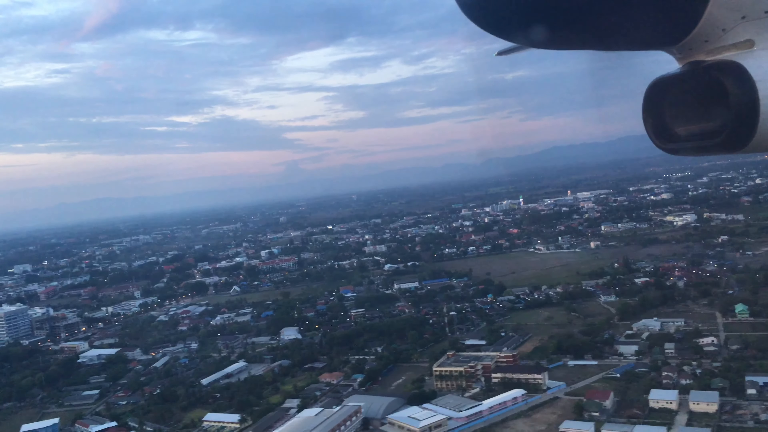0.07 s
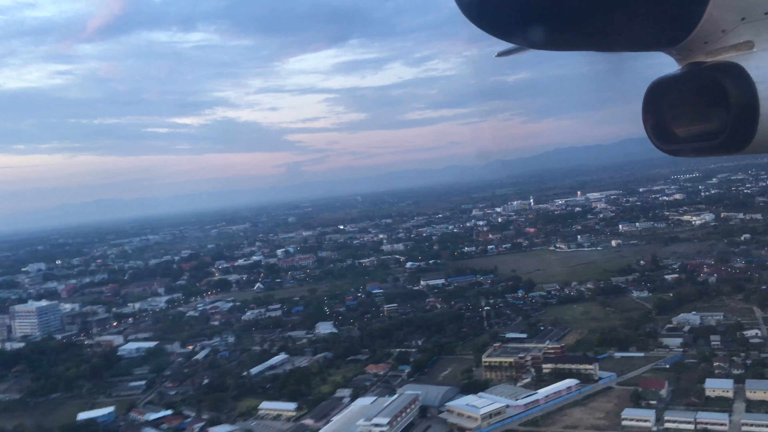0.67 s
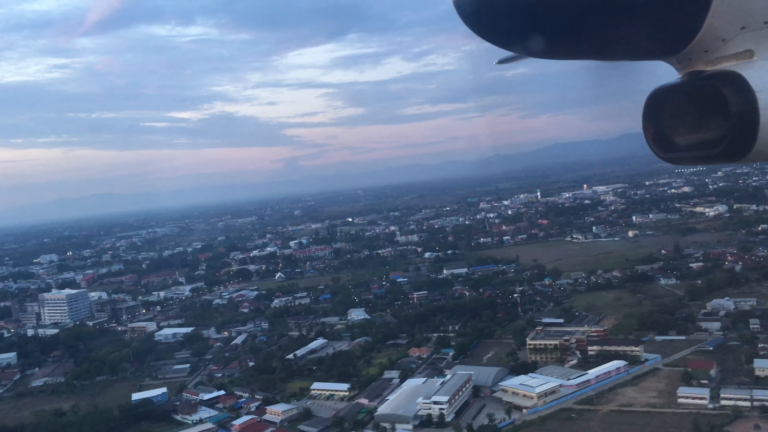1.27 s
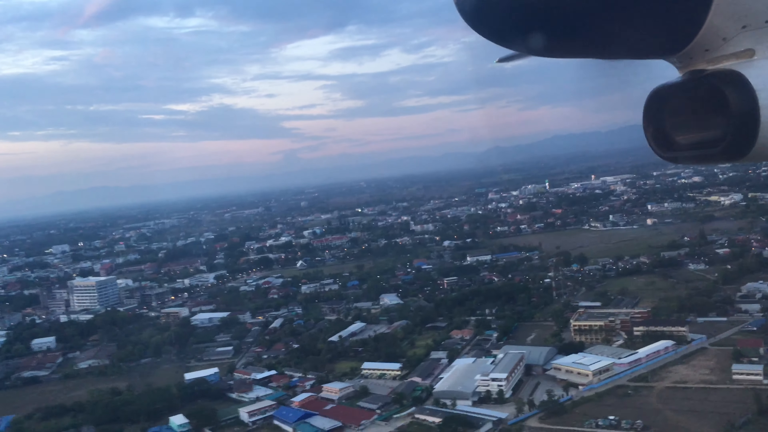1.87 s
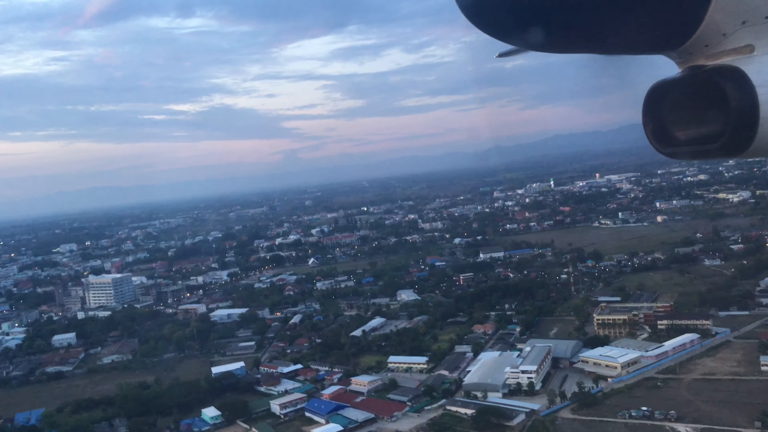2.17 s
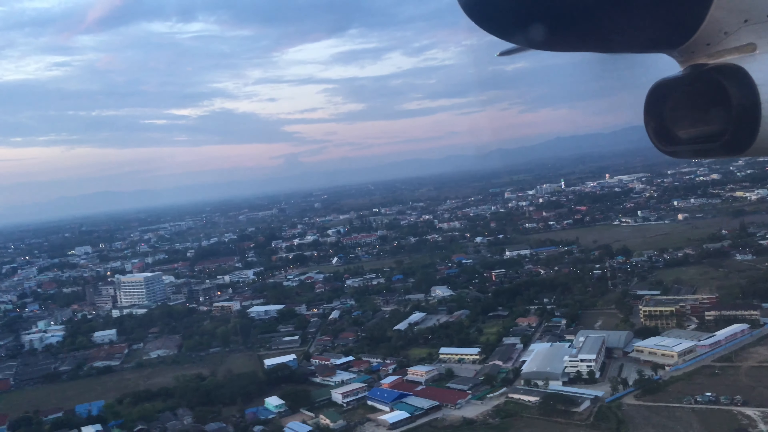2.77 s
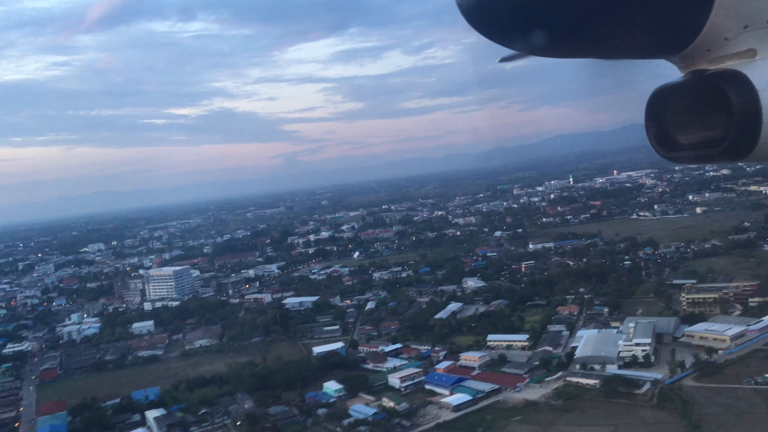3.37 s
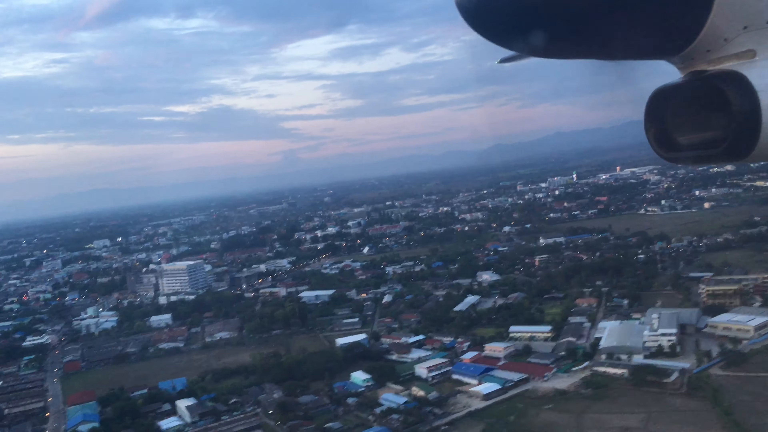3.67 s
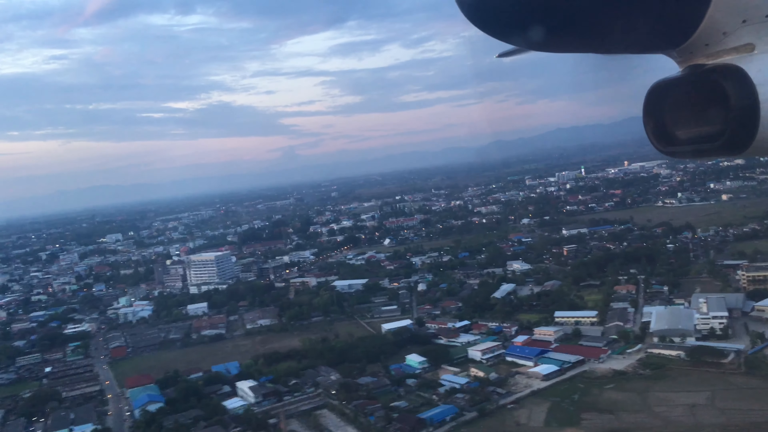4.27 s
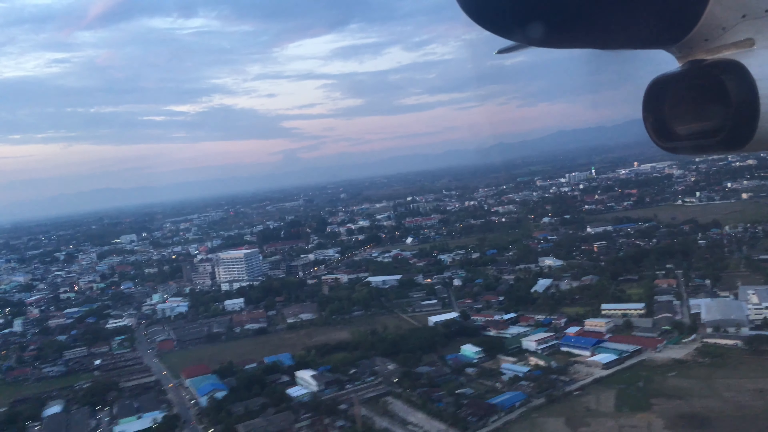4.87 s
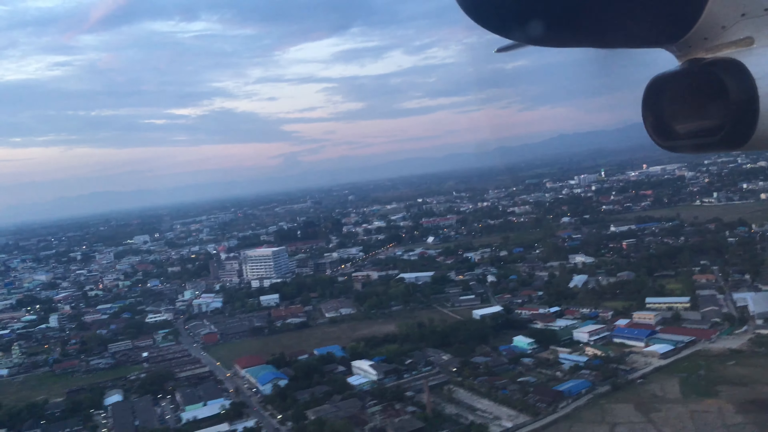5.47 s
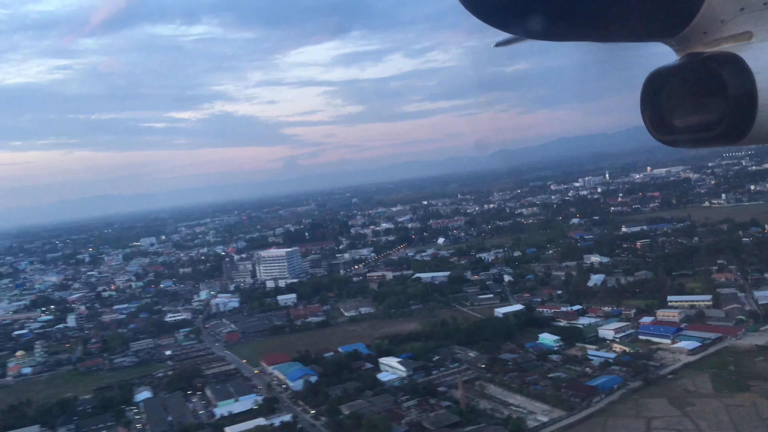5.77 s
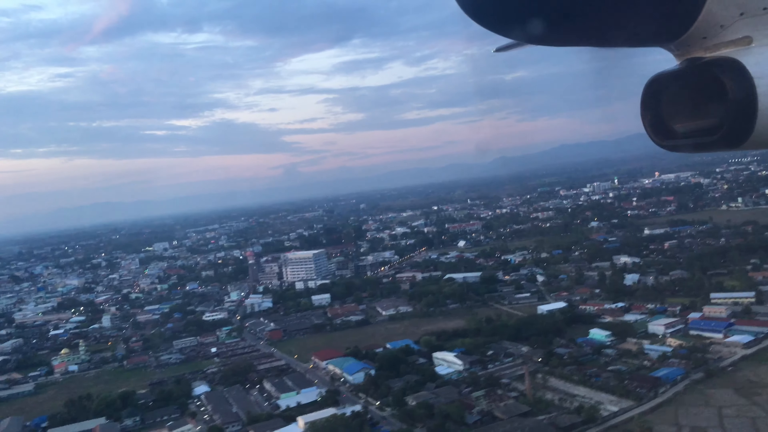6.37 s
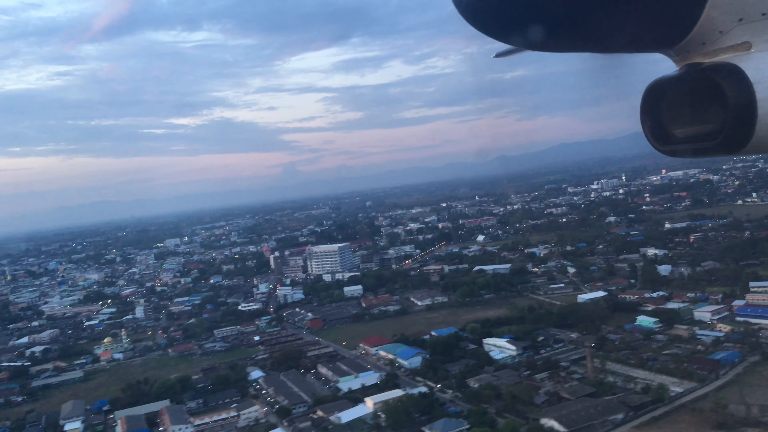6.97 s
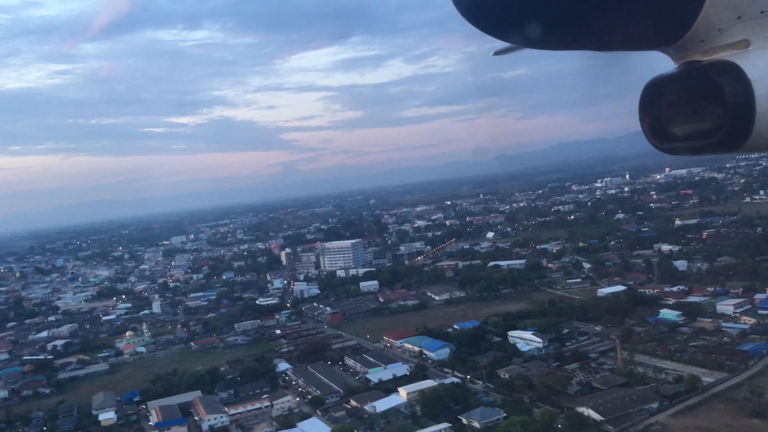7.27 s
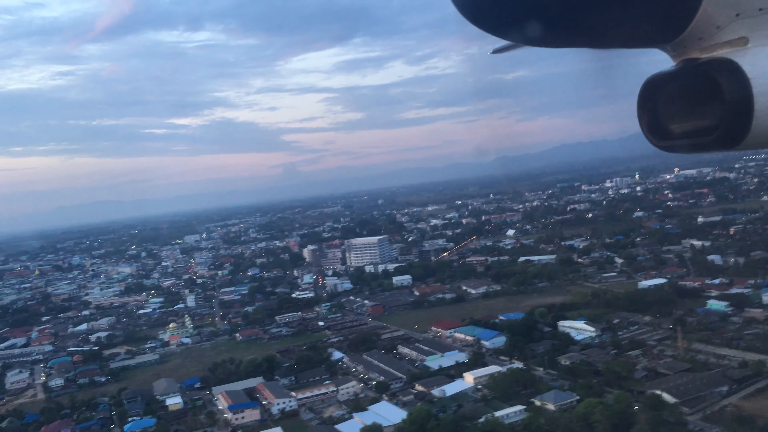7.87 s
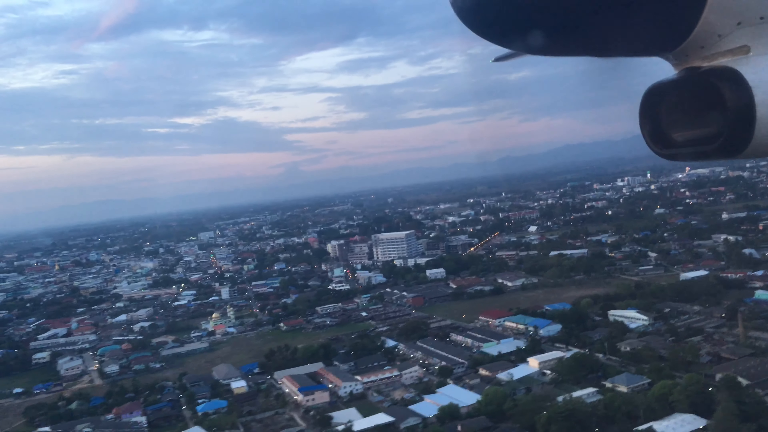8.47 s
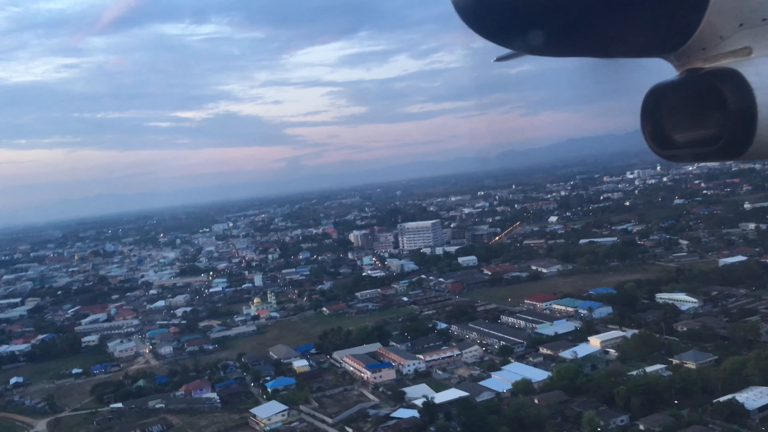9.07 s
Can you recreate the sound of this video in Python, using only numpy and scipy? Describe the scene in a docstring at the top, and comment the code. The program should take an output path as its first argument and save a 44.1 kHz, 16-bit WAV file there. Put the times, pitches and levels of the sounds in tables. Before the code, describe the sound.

A loud, deep drone of twin turboprop engines fills the cabin of a descending plane for about nine seconds, heard from a window seat next to the engine. The propeller hum keeps one pitch throughout, throbbing with small irregular swells and dips. Under it, air buffets the cabin wall with a low rumble that surges briefly at the very start and near 3.9, 5.6 and 6.7 seconds. A steady rush of air and a soft hiss run alongside. Above these sits a faint, high, buzzing turbine whine, clearest in the first second, weaker around 2.5 to 3.5 seconds, and a little buzzier from about 5.5 seconds on. A plastic trim panel gives a very faint tick at about 2.7 seconds and a slightly clearer one at 5.3 seconds. The drone continues evenly to the end.

```python
"""A deep hum, a rumble and a rush of air: a window seat beside the engine of a descending twin turboprop.
Propeller blades beat on the fuselage (hum); the slipstream buffets the cabin (rumble) and rushes
along the skin. The gas turbine, easing off a little, whines through the blades, which chop its
tones into a buzz. The cabin trim ticks."""
import sys
import numpy as np
from scipy import signal
from scipy.fft import rfft, irfft
from scipy.io import wavfile
from scipy.ndimage import uniform_filter1d

SR = 44100
rng = np.random.default_rng(int(sys.argv[2]) if len(sys.argv) > 2 else 0)


def wrap_up_sound(samples):
    """Save the sound to the file named by the first command line argument, as 16-bit audio."""
    columns = np.atleast_2d(samples).T
    # keep every value between -1 and 1, then stretch to whole-number steps
    tamed = np.clip(columns, -1, 1)
    steps = np.round(tamed * 32767).astype(np.int16)
    wavfile.write(sys.argv[1], SR, steps)


N = 407043


def undb(db):
    """dB to gain."""
    return 10 ** (np.asarray(db) / 20)


def swell(db):
    """Gain of a level curve about its own mean."""
    return undb(db - np.mean(db))


def unit(x):
    """Scale to rms 1."""
    return x / np.sqrt(np.mean(np.abs(x) ** 2))


def curves(table):
    """Columns after the first (t/s), linearly interpolated per sample."""
    times_s, *columns = np.transpose(table)
    return [np.interp(np.arange(N) / SR, times_s, column) for column in columns]


def surges(table):
    """Sum of bell-shaped level changes in dB; lengths at half height."""
    t = np.arange(N) / SR
    return sum(db * .5 ** ((2 * (t - mid_s) / length_s) ** 2) for mid_s, length_s, db in table)


def walk(rate_hz):
    """Smooth random wander, rms 1, mostly below rate_hz."""
    f = np.arange(N + 1) * SR / (2 * N)
    white = rfft(rng.standard_normal(2 * N))
    return unit(irfft(white / (1 + (f / rate_hz) ** 2))[:N])


def angle(hz):
    """Running phase in rad, random start."""
    return 2 * np.pi * (np.cumsum(hz) / SR + rng.random())


def wakes(blade_rad, sharpness):
    """One smooth pulse of height 1 per passing blade."""
    return np.exp(sharpness * (np.cos(blade_rad) - 1))


def turbulence(spectrum, resonances=()):
    """Random pressure of given spectral density, lifted at each resonance."""
    f = np.arange(N // 2 + 1) * SR / N
    hz, db = np.transpose(spectrum)
    shape_db = np.interp(np.log(f + 1), np.log(hz), db)
    for centre_hz, width_hz, boost_db in resonances:
        shape_db += boost_db * .5 ** ((2 * (f - centre_hz) / width_hz) ** 2)
    return irfft(rfft(rng.standard_normal(N)) * undb(shape_db), N) * np.sqrt(SR / 2)


def trim_ticks(scrape_s=.007, scrape_db=1.0):
    """A plastic panel slips: brief scrape, short ring of its modes."""
    # slips: t/s, level/dB
    ticks = [(2.745, -55), (5.315, -59), (5.323, -47)]
    # panel modes: f/Hz, relative level/dB, t60/s
    modes = [(1960, 3, 0.031), (2700, -3, .15), (3390, 0, 0.044), (4650, -6, .08), (5400, -13, .03),
             (7510, -10, .05), (9000, -11, .03)]
    t = np.arange(SR // 6) / SR
    ring = sum(undb(db - 60 * t / t60_s) * np.sin(2 * np.pi * hz * t) for hz, db, t60_s in modes)
    out = np.zeros(N)
    for start_s, db in ticks:
        scrape = signal.lfilter([1], [1, -.5], rng.standard_normal(len(t))) * np.exp(-t / scrape_s)
        start = int(start_s * SR)
        out[start:start + len(t)] += undb(db) * (ring + undb(scrape_db) * scrape)
    return out


def airflow(flow_db, hiss_db, flicker_db=0.5):
    """The boundary layer rushes over the skin panels and hisses at the window."""
    # rush along the skin: f/Hz, density/dB
    rush_spectrum = [(250, -97.5), (450, -75), (750, -71.5), (1050, -75.5), (1400, -81.5), (1800, -89.5),
                     (3000, -115)]
    # skin panel resonances: f/Hz, width/Hz, boost/dB
    panels = [(561, 41, 4), (685, 51, 3.5), (768.5, 98, 6.5), (1015, 90, 2.5)]
    # window hiss: f/Hz, density/dB
    hiss_spectrum = [(900, -108), (1800, -89), (2900, -89.5), (3700, -93.5), (4080, -98.5), (4500, -97),
                     (5050, -105), (5450, -99.5), (7500, -100), (9000, -96), (10300, -102), (11500, -99.5),
                     (13500, -99), (15700, -99)]
    rush = turbulence(rush_spectrum, panels) * swell(flow_db + flicker_db * walk(12))
    hiss = turbulence(hiss_spectrum) * swell(hiss_db + 0.5 * walk(16))
    return rush + hiss


def gears(shaft_hz, far_db=-15, far_ratio=1.006):
    """Shaft and gear tones, carried by the wing: the near engine wavers and beats against the far one."""
    # tones: multiples of shaft speed
    orders = [1, 3, 4, 5, 5.3, 6, 13, 14.3]
    # near engine, per tone: level/dB
    levels_db = [-35.5, -58, -56.5, -69, -80.5, -64, -79, -78]
    out = 0
    for order, db in zip(orders, levels_db):
        near = np.sin(angle(order * shaft_hz) + 0.18 * walk(7.3))
        far = undb(far_db) * np.sin(angle(order * shaft_hz * far_ratio))
        out += (near + far) * undb(db + walk(0.72))
    return out


def chopped_tone(hz, blade_rad, kick_rad, sway_rad, shade, sharpness, glint=0, lead_rad=0):
    """Turbine tone through the propeller: each blade bends its phase, lifts (glint) and dims (shade) it."""
    bend_rad = kick_rad * wakes(blade_rad, sharpness) + sway_rad * np.cos(blade_rad)
    bend_rad *= 1 + .1 * walk(1)
    scatter = .12 * (walk(30) + 1j * walk(30))  # narrow skirt from turbulent air
    tone = (1 + scatter) * np.exp(1j * (angle(hz) - bend_rad))
    # glint leads the kick, dimming trails it: lopsided sidebands
    lift = glint * wakes(blade_rad + lead_rad, sharpness)
    dimming = shade * wakes(blade_rad - 1.35, sharpness / 4)
    return unit((1 + lift - dimming) * tone.real)


def turbine(shaft_hz, blade_rad, churn_shade=0.25, whine_offset_db=-2.5, buzz_offset_db=-1.0):
    """Compressor whine, a buzzing band near its octave, pulsing hiss and weaker tones of other stages."""
    # compressor whine, buzz (a propeller sideband of its octave): multiples of shaft speed
    compressor_orders = [18.3, 36.305]
    # before offsets: t/s, whine level/dB, buzz level/dB
    levels = [(0, -46, -57), (.6, -47, -55), (1.2, -50, -58), (1.9, -52, -58), (2.4, -55, -57.5),
              (3.3, -55.5, -58.5), (3.8, -51.5, -57.5), (4.4, -53, -59), (5.45, -50, -54.5),
              (5.9, -53, -55.3), (7.1, -51, -52.5), (8.4, -51.5, -53.5), (9.2, -53.5, -55.3)]
    # air churned by the compressor blades: f/Hz, density/dB
    churn_spectrum = [(5200, -120), (5850, -90), (6220, -90.5), (6500, -97), (7200, -125), (10800, -125),
                      (11600, -99), (12050, -88.5), (12450, -91.5), (12900, -100.5), (13600, -120)]
    # other stages: multiples of shaft speed
    stage_orders = [17.3, 20.41, 21.3, 22.3, 23.72, 25.84, 27.3, 31.6, 33.6, 37.5, 40.9, 45.05]
    # per stage: level/dB
    stage_db = [-68, -73, -76, -74, -76, -79, -72, -70, -78, -72, -79, -79]
    whine_db, buzz_db = curves(levels)
    whine_hz, buzz_hz = np.outer(compressor_orders, shaft_hz)
    whine = chopped_tone(whine_hz, blade_rad, kick_rad=-1.95, sway_rad=.45,
                         shade=.62, sharpness=9, glint=.7, lead_rad=1.5)
    buzz = chopped_tone(buzz_hz, blade_rad - 2.65, kick_rad=3.4, sway_rad=.9,
                        shade=.2, sharpness=6, glint=1.4, lead_rad=3.35)
    churn = turbulence(churn_spectrum) * swell(.5 * buzz_db)
    churn *= 1 - churn_shade * wakes(blade_rad - 1.8, sharpness=1.5)
    whine *= undb(whine_db + whine_offset_db + .6 * walk(8.9))
    buzz *= undb(buzz_db + buzz_offset_db)
    out = whine + buzz + churn
    for order, db in zip(stage_orders, stage_db):
        stage = chopped_tone(order * shaft_hz, blade_rad + rng.uniform(0, 2 * np.pi),
                             kick_rad=1.1, sway_rad=.3, shade=.4, sharpness=5)
        out += stage * undb(db + 1.3 * walk(0.91))
    return out


def buffet(flow_db, evenness=0.69, deep_top_hz=95, flow_share=.65):
    """Slipstream eddies shake the wall, the cabin booms; lows swell and dip, the rest follows the flow."""
    # buffet through the wall: f/Hz, relative density/dB
    spectrum = [(20, -78.5), (29, -71.5), (37, -48), (55, -42.5), (90, -38.5), (125, -46), (150, -46.5),
                (178, -52.5), (215, -54.5), (255, -59.5), (400, -61.5), (500, -77.5), (700, -110)]
    # cabin air and wall resonances: f/Hz, width/Hz, boost/dB
    resonances = [(70.7, 21.4, 9), (110.56, 7.9, 14.5), (297, 40, 2.5), (371.3, 23, 3.5)]
    # swells and dips of the deep rumble: middle t/s, length/s, change/dB
    rumble_swells = [(.21, .16, 4.5), (2.35, 0.16, -1.5), (3.05, .15, 1), (3.37, 0.22, -0.5),
                     (3.85, 0.11, 3.5), (5.57, .25, 6.5), (6.02, 0.2, 0), (6.68, .15, 7), (7.12, 0.29, 2.5),
                     (8.63, 0.18, 2.5), (9.05, 0.067, 2)]
    boom = turbulence(spectrum, resonances)
    envelope = unit(np.sqrt(uniform_filter1d(boom ** 2, SR // 6)))
    boom /= envelope ** evenness
    deep = signal.sosfiltfilt(signal.butter(4, deep_top_hz, fs=SR, output="sos"), boom)
    return deep * swell(surges(rumble_swells)) + (boom - deep) * swell(flow_share * flow_db)


def propeller(blade_rad, level_db=-15.0, throb_db=1.16, throb_hz=13.0, flutter_db=0.25):
    """Each blade pushes on the wall; the hum swells and dips at listed moments and throbs at random."""
    # blade pressure wave: multiple of blade rate, relative level/dB
    harmonics = [(1, 2.5), (2, -13.5), (3, -33), (4, -39.5)]
    # irregular swells and dips of the hum: middle t/s, length/s, change/dB
    hum_swells = [(.08, .16, 3), (.32, 0.13, -8), (.73, 0.058, 8.5), (.93, 0.16, 4.5), (1.25, 0.1, -3.5),
                  (1.98, 0.12, 4.5), (2.66, 0.093, -4.5), (3.1, 0.13, 5), (3.52, 0.11, -8.5),
                  (4.12, 0.033, 10.5), (4.42, 0.046, 8.5), (5.15, .25, -1.5), (5.42, 0.09, 3),
                  (6.4, 0.058, 4.5), (6.77, .09, -7), (7.03, 0.12, -3.5), (7.62, 0.047, 4.5),
                  (8.73, 0.2, 4.5)]
    (_, fundamental_db), *overtones = harmonics
    hum = np.sin(blade_rad) * undb(fundamental_db + surges(hum_swells) + throb_db * walk(throb_hz))
    for order, db in overtones:
        overtone = np.sin(order * blade_rad + rng.uniform(0, 2 * np.pi))
        hum += overtone * undb(db + flutter_db * walk(0.48))
    return hum * undb(level_db)


def scene(blade_hz=102.0):
    """Engine, slipstream and trim at one seat, mono."""
    # air stream, used about its mean: t/s, rush level/dB, hiss level/dB
    flow_levels = [(0, -41, -53.5), (.7, -43, -53.5), (1.4, -42.5, -54.5), (2.4, -43, -56),
                   (2.85, -42, -54.5), (3.4, -43, -56), (4.6, -43, -56), (5.4, -42, -54),
                   (6.0, -43.2, -55.5), (7.2, -40.5, -53.5), (9.2, -43, -56)]
    # gas turbine shaft speed: t/s, f/Hz
    shaft_speed = [(0, 341.1), (.7, 341.0), (2, 340.4), (3, 339.7), (4, 339.35), (5, 338.95), (6, 338.75),
                   (7.5, 338.6), (8.3, 338.6), (9.23, 338.8)]
    flow_db, hiss_db = curves(flow_levels)
    shaft_hz, = curves(shaft_speed)
    # governed propeller: constant speed, slight phase wander
    blade_rad = angle(np.full(N, blade_hz)) + 0.024 * walk(7.8)
    engine = propeller(blade_rad) + gears(shaft_hz) + turbine(shaft_hz, blade_rad)
    return (engine + buffet(flow_db) + airflow(flow_db, hiss_db) + trim_ticks())[None]


def record(dry, top_hz=15600):
    """Steep low-pass on the top treble."""
    return signal.sosfilt(signal.ellip(10, .1, 80, top_hz, fs=SR, output="sos"), dry)


dry = scene()
out = record(dry)
wrap_up_sound(out)
```